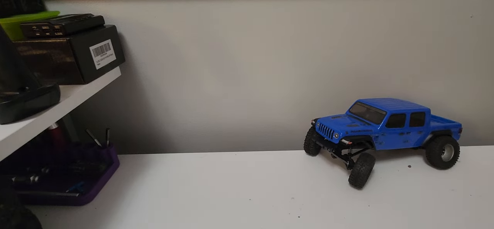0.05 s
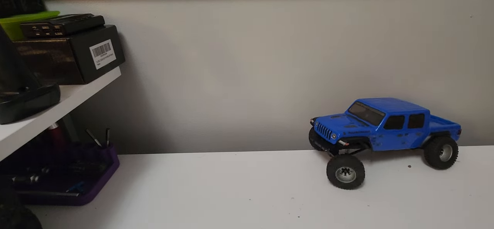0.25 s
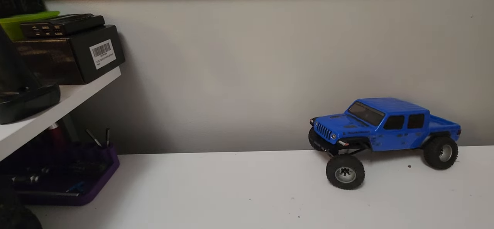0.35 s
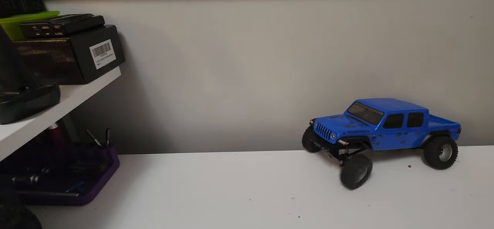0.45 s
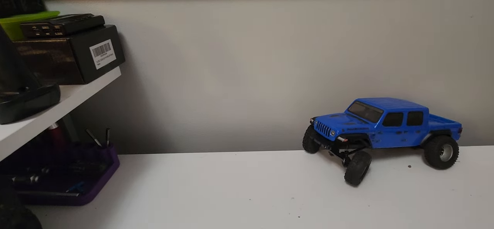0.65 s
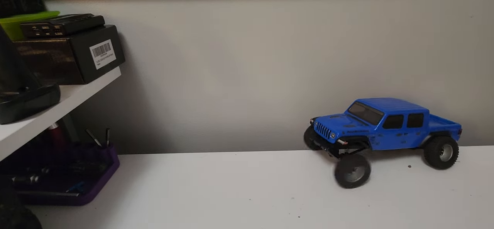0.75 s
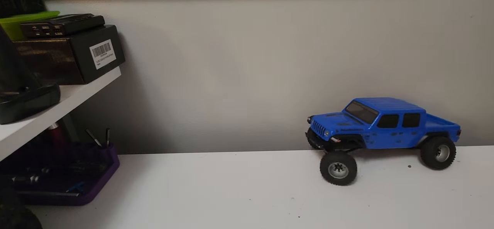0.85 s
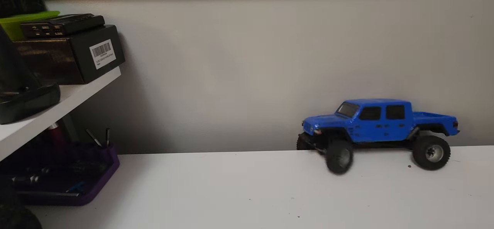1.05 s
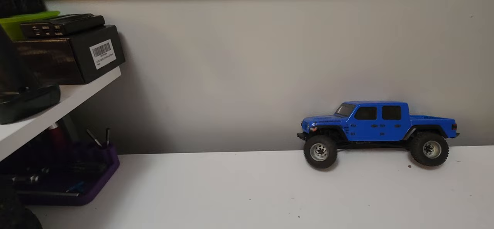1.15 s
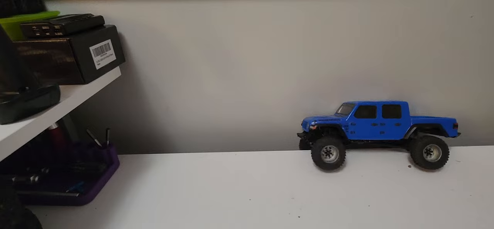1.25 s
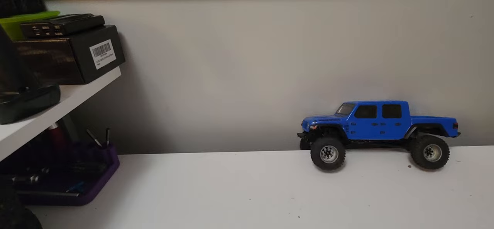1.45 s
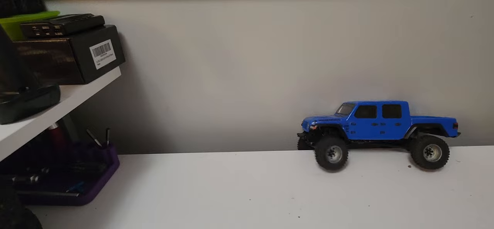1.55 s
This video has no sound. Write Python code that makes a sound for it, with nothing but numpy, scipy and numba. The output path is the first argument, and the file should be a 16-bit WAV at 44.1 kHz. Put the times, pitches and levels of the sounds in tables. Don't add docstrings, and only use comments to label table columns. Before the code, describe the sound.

A toy truck's small servo whirrs in short, bright, gritty bursts with plastic clicks and rod clacks, then its wheels knock and bounce on a hollow desk; small quiet room, close stereo microphone.

```python
import sys
import numpy as np
from scipy import signal
from scipy.io import wavfile
from scipy.ndimage import uniform_filter1d, map_coordinates
from numba import njit

SR = 44100
rng = np.random.default_rng(int(sys.argv[2]) if len(sys.argv) > 2 else 0)


def dump_mix(stems):
    frames = np.atleast_2d(stems).T
    limited = np.clip(frames, -1, 1)
    pcm = np.round(limited * 32767).astype(np.int16)
    wavfile.write(sys.argv[1], SR, pcm)


def invert_db(level):
    return 10 ** (np.asarray(level, dtype=float) / 20)


N = 70560
T = np.arange(N) / SR

# (frequency [Hz], level [dB])
AIR_COLOUR = [(15, -29), (25, -4.5), (206, -26), (591, -40), (3720, -48), (4140, -39), (9000, -53),
              (16000, -64)]
# (time [s], level [dB])
PUSH_CLICKS = [
    (0.206, -24),
    (0.82, -25),
    (1.591, -41.5),
]
# (frequency [Hz], level [dB], time to fade by 60 dB [s])
PUSH_RINGING = [(787, -19, 0.089), (1404, 0, 0.025), (2240, -17, 0.0065), (4100, -10, 0.0032),
                (6000, 3.5, .012), (7750, 1, 0.018)]
# (time [s], level [dB])
PULL_CLICKS = [
    (0.46, -21),
    (1.015, -20.5),
]
# (frequency [Hz], level [dB], time to fade by 60 dB [s])
PULL_RINGING = [(1523, -7, 0.03), (1502, -22, 0.19), (2006, -3, 0.0094), (3030, -9.5, 0.0083),
                (4440, -1, 0.01), (5700, 0.5, 0.016)]
# (time [s], level [dB], pitch [Hz], time to fade by 60 dB [s])
ROD_CLACKS = [(0.237, -23.5, 788, 0.046), (0.2423, -28.5, 448, 0.069), (.348, -31.5, 711, 0.077),
              (.378, -41, 425, 0.097), (.488, -22, 1264, 0.025), (.493, -27, 484, 0.033),
              (.533, -33, 884, 0.032), (.598, -36, 800, 0.065), (.864, -29.5, 438, 0.059),
              (.921, -35, 687, 0.091), (0.979, -34, 1190, 0.047), (1.043, -23.5, 465, 0.045),
              (1.258, -32.5, 962, 0.092), (1.338, -30, 891, 0.19), (1.39, -46.5, 554, 0.14),
              (1.415, -42.5, 377, 0.079), (1.453, -38, 553, 0.13), (1.48, -42.5, 387, .07)]
# (multiple of its pitch [ratio], level [dB], part of its fade time [ratio])
ROD_RINGING = [(1, 4.5, 0.95), (1.6, -4.5, 0.62), (2.5, -4, 0.27)]
# (time [s], level [dB])
SERVO_TICKS = [(.148, -73), (.167, -60), (.182, -49), (.231, -40), (.781, -41), (1.563, -48)]
# (time [s], level [dB], contact time [ms], desk tone favoured by the spot [Hz])
WHEEL_KNOCKS = [(0.002, -44.5, 3.7, 119), (0.267, -29, 12.4, 79.5), (.325, -28.5, 10, 54.6),
                (0.551, -37.5, 2.2, 204), (0.679, -35, 6.6, 64), (0.874, -42, 5, 140),
                (1.0954, -5.5, 0.52, 370), (1.0987, -9, 2.9, 80.4), (1.118, -20, 0.7, 995),
                (1.1723, -9.5, 0.55, 202), (1.1938, -10, 0.22, 195), (1.202, -10.5, 1.02, 270),
                (1.208, -9.5, 0.97, 206), (1.214, -14, 0.43, 770), (1.2236, -12, 0.85, 258),
                (1.2315, -24, 0.66, 460), (1.245, -26.5, 1.1, 258), (1.28, -25.5, 0.42, 258),
                (1.293, -23, 2.7, 146), (1.338, -24.5, 3.5, 146), (1.362, -28, 2.3, 121),
                (1.418, -36.5, 2.7, 190), (1.452, -38, 1.9, 146), (1.482, -35.5, 2.1, 188),
                (1.53, -41, 4.4, 146)]
# (frequency [Hz], level [dB], time to fade by 60 dB [s])
DESK_TONES = [(54, -7, 0.34), (79.1, 1.5, 0.24), (118.6, -4.5, 0.17), (146, -5.5, 0.11), (195, -7.5, 0.1),
              (256, -5, 0.14), (357, -4, 0.077), (459, -3, 0.04), (540, -5, 0.037), (652, -7.5, 0.051),
              (771, -4, 0.037), (920, -6.5, 0.053), (1026, 1, 0.039), (1176, -1, 0.031),
              (1364, -1.5, 0.024)]
# (start [s], length [s], rise time [s], rattle level [dB])
SERVO_RUNS = [(-.05, 0.049, 0.014, -52), (0.213, 0.02, 0.018, -37), (0.234, .12, 0.014, -33.5),
              (0.481, 0.15, 0.037, -35), (0.774, .17, 0.1, -34), (1.025, 0.12, 0.052, -32.5),
              (1.147, 0.14, 0.051, -38), (1.301, 0.057, 0.0078, -38), (1.383, 0.027, 0.013, -40),
              (1.439, 0.038, 0.012, -39.5), (1.569, 0.05, 0.0045, -48.5)]
# (frequency [Hz], width [Hz], level [dB], left over right [dB])
CASE_TONES = [(800, 228, -10.5, 0), (1310, 270, -21, 3), (2400, 1100, -22, 2.5), (4200, 2700, -39, -1),
              (5700, 790, -13, 4), (7300, 1170, -4.5, -4.5), (8000, 830, -8.5, -4.5), (10890, 1200, -6, 1),
              (11950, 1460, -5, -7), (13040, 2170, -9.5, 8.5), (15600, 1060, -7, 14.5),
              (15730, 110, -15, 0)]
# (time [s], teeth per second [Hz], whine level [dB])
EARLY_SWEEPS = [
    [(.243, 7650, -41.5), (.254, 7300, -32), (.266, 6420, -34), (.28, 6600, -43), (.287, 6950, -30),
     (.298, 6250, -27.5), (.306, 5800, -26), (.322, 6120, -35), (.336, 5900, -31.5), (.355, 5210, -32.5)],
    [(.505, 7200, -38), (.524, 7380, -21), (.534, 6874, -25), (.546, 6814, -24.5), (.56, 7120, -33.5),
     (.574, 6080, -28.5), (.601, 5970, -26), (.617, 5210, -30)],
    [(.838, 5500, -35), (.853, 6050, -33), (.866, 6700, -42), (.872, 6900, -36), (.881, 6300, -31),
     (.891, 6000, -40), (.904, 6320, -33), (.917, 5850, -31), (.932, 5150, -30)],
]
LATE_SWEEPS = [
    [(1.052, 6850, -52), (1.072, 7190, -27.5), (1.102, 7330, -25), (1.11, 7000, -55), (1.12, 6000, -27.5),
     (1.134, 4850, -25)],
    [(1.208, 7520, -35), (1.221, 6600, -25.5), (1.232, 6560, -32)],
    [(1.308, 6000, -63), (1.32, 6400, -33.5), (1.331, 7020, -33.5), (1.352, 7300, -39)],
]
# (time [s], length [s], start pitch [Hz], end pitch [Hz], level [dB])
GEAR_SQUEAKS = [(0, 0.041, 5490, 5300, -70), (0, 0.057, 10800, 10500, -72),
                (0.231, 0.0038, 11800, 11500, -29.5), (0.258, 0.011, 14800, 14950, -30),
                (.266, 0.0043, 14900, 14300, -36), (.274, 0.011, 14700, 14900, -41),
                (0.302, 0.018, 15000, 15700, -36), (0.316, .012, 15300, 15100, -43),
                (0.54, 0.0088, 14900, 14400, -50), (.544, 0.012, 15500, 15500, -42),
                (.585, 0.023, 12100, 13000, -29), (0.801, 0.022, 11600, 11950, -48),
                (.85, .008, 14700, 14600, -37), (0.86, 0.014, 11940, 12100, -48),
                (.92, 0.013, 8500, 7950, -52), (1.146, .016, 14400, 14100, -41),
                (1.244, .04, 8130, 7800, -53), (1.383, 0.016, 8120, 7750, -43),
                (1.451, 0.026, 13100, 12950, -40.5), (1.34, 0.021, 11300, 10760, -41.5),
                (0.55, 0.026, 11300, 11400, -36.5), (0.827, 0.018, 14300, 15150, -46),
                (.874, 0.033, 15200, 15300, -39), (1.216, 0.015, 15160, 15600, -38),
                (1.262, 0.022, 14700, 14600, -37.5), (1.342, 0.021, 14800, 14700, -38)]


@njit
def band_pass(x, hz, width):
    y, band, low = np.empty(len(x)), 0., 0.
    g, k = np.tan(np.pi * hz / SR), width / hz
    for i in range(len(x)):
        v = (band + g * (x[i] - low)) / (1 + g * (g + k))
        band, low = 2 * v - band, low + 2 * g * v
        y[i] = k * v
    return y


def wander(rate):
    hold = int(SR / rate)
    steps = np.repeat(rng.standard_normal(N // hold + 1), hold)
    return 1.98 * uniform_filter1d(uniform_filter1d(steps, hold), hold)[:N]


def add(out, at, sound):
    i = int(at * SR)
    out[..., i:i + sound.shape[-1]] += sound[..., :N - i]


def ring(modes, scale=1, spread_db=2.5, detune=0.025):
    hz, db, t60 = np.array(modes).T[:, :, None]
    t = T[:int(t60.max() * SR)]
    chance = rng.standard_normal((3,) + db.shape)
    sign = np.where(hz < 100, 1, np.sign(chance[1]))
    strength = invert_db(db + spread_db * chance[0]) * sign
    tone = np.sin(2 * np.pi * hz * scale * (1 + detune * chance[2]) * t)
    fade = np.exp(-np.log(1000) * t / t60)
    y = (strength * tone * fade).sum(axis=0)
    return y / np.abs(y).max()


def crack(decay_s, hz, width):
    y = rng.standard_normal(SR // 8)
    for _ in range(2):
        y = band_pass(y, float(hz), 1.48 * width)
    y = y * np.exp(-T[:SR // 8] / decay_s)
    return y / np.abs(y).max()


def two_port_crack(decay_s, hz, width):
    shared = crack(decay_s, hz, width)
    own = np.array([crack(decay_s, hz, width) for _ in range(2)])
    return 0.57 * shared + 0.83 * own


def air():
    out = 0
    f, level_db = np.array(AIR_COLOUR).T
    for hz in 30 * 2 ** np.arange(0, 9.1, .5):
        mid, side = (band_pass(rng.standard_normal(N), hz, hz / 3) for _ in range(2))
        db = np.interp(np.log(hz), np.log(f), level_db) + 1.5 * wander(3.2)
        apart = min(hz / 430, 1) * side * np.array([[1], [-1]])
        out = out + invert_db(db) * (mid + apart)
    supply = invert_db(-75 + 1.6 * wander(60)) * np.sin(2 * np.pi * 15900 * T)
    return out * invert_db(-62.5) / out.std() + supply


def room_tail(near):
    t60_s, first_echo_s = 0.24, .0015
    t = T[:SR // 3]
    tail = rng.standard_normal((2, len(t))) * np.exp(-np.log(1000) * t / t60_s) * (t > first_echo_s)
    tail = np.array([band_pass(side, 1285.0, 2520.0) for side in tail])
    tail = tail / np.sqrt((tail ** 2).sum(axis=1, keepdims=True))
    return invert_db(-8.5) * signal.fftconvolve(near, tail, axes=1)[:, :N]


def remote_clicks():
    out = np.zeros((2, N))
    for events, modes in ((PUSH_CLICKS, PUSH_RINGING), (PULL_CLICKS, PULL_RINGING)):
        for at, db in events:
            add(out, at, invert_db(db) * ring(modes))
            add(out, at + .0025, invert_db(db + 4) * ring(modes))
            add(out, at, invert_db(db + 2) * crack(0.0031, 6930, 5500))
    return out


def rod_clacks():
    out = np.zeros((2, N))
    for at, db, hz, t60 in ROD_CLACKS:
        modes = np.array(ROD_RINGING) * [1, 1, t60]
        add(out, at, invert_db(db - 4.5) * ring(modes, hz, spread_db=3, detune=0.0062))
        add(out, at, invert_db(db + 0.5) * two_port_crack(0.0072, 2560, 7900))
    for at, db in SERVO_TICKS:
        add(out, at, invert_db(db) * crack(.002, 12300, 6000))
    return out


def desk(load):
    spot_db, spot_octaves = 8, 0.083
    out = np.zeros((2, N))
    for at, db, ms, spot_hz in WHEEL_KNOCKS:
        struck = []
        for hz, level_db, t60 in DESK_TONES:
            distance = np.log2(hz / spot_hz) / spot_octaves
            struck.append((hz, level_db + spot_db / (1 + distance ** 2), t60))
        push = np.hanning(int(ms * SR / 1000) + 3)
        boom = np.convolve(ring(struck, spread_db=0.87, detune=0.0071), push / push.sum())
        add(out, at, -invert_db(db) * boom)
        hardness = 1 / (1 + ms ** 3)
        add(out, at, invert_db(db - 3.5) * hardness * crack(0.004, 2170, 4100))
        add(out, at, invert_db(db - 17.5) * hardness * two_port_crack(0.027, 1470, 4600))
    scrub = signal.fftconvolve(load * rng.standard_normal(N), ring(DESK_TONES[:4]))[:N]
    return out + invert_db(-43) * scrub


def effort():
    stop_db, stop_s, coast_db_per_s = -13.5, 0.025, 158
    out = 0
    for at, length, rise, db in SERVO_RUNS:
        after = np.maximum(T - at - length, 0)
        fall_db = stop_db * np.minimum(after / stop_s, 1) - coast_db_per_s * after
        out = out + np.clip((T - at) / rise, 0, 1) ** 0.99 * invert_db(db + fall_db)
    return out * invert_db(2.27 * wander(39.94))


def radiated(hz):
    f, width, db, pan_db = np.array(CASE_TONES).T[:, :, None]
    power = invert_db(2 * db) / (1 + (2 * (hz - f) / width) ** 2) ** 1.98
    return np.sqrt([(power * invert_db(side * pan_db)).sum(axis=0) for side in (1, -1)])


def whine():
    octave_db, left_lead_rad, edge_s = -2, .7, 0.0017
    out = np.zeros((2, N))
    jitter = 1 + .003 * wander(700)
    flutter = [invert_db(2.5 * wander(420)) for _ in range(2)]
    for sweep in EARLY_SWEEPS + LATE_SWEEPS:
        t, hz, db = np.array(sweep).T
        on = (T > t[0]) & (T < t[-1])
        now = T[on]
        hz = np.interp(now, t, hz)
        phase = 2 * np.pi * np.cumsum(hz * jitter[on]) / SR
        edge = np.clip(np.minimum(now - t[0], t[-1] - now) / edge_s, 0, 1)
        tone = 0
        for k in range(2):
            lead = (1 - k) * np.array([[left_lead_rad], [0]])
            level = invert_db(k * octave_db) * radiated((k + 1) * hz) * (6000 / hz) ** (3 * k)
            tone = tone + level * flutter[k][on] * np.sin((k + 1) * phase + lead)
        out[:, on] += edge * invert_db(np.interp(now, t, db)) * tone
    for at, length, hz0, hz1, db in GEAR_SQUEAKS:
        on = (T > at) & (T < at + length)
        hz = np.linspace(hz0, hz1, on.sum()) * jitter[on]
        swell = np.hanning(on.sum()) ** .5 * flutter[1][on]
        out[:, on] += invert_db(db - 0.5) * swell * np.sin(2 * np.pi * np.cumsum(hz) / SR)
    return out * invert_db(8)


def servo(load):
    hits_per_s, scatter_db = 18000, 3
    out = whine()
    hit = rng.random(N) < hits_per_s / SR
    teeth = hit * rng.choice([-1., 1.], N) * invert_db(scatter_db * rng.exponential(size=N))
    teeth = load * teeth / teeth.std()
    for hz, width, db, pan_db in CASE_TONES:
        own = load * rng.standard_normal((2, N)) * 1.244
        flicker = invert_db(1.59 * wander(140))
        body = []
        for noise in own:
            shaken = band_pass(flicker * (teeth + noise) * 3, float(hz), 1.35 * width)
            body.append(band_pass(shaken, float(hz), 2.0 * width))
        out = out + invert_db(db) * np.array(body) * invert_db(np.array([[pan_db], [-pan_db]]) / 2)
    return out


def scene():
    left_lag_s = 5.8e-5
    load = effort()
    near = servo(load) + remote_clicks() + rod_clacks() + desk(load)
    left = map_coordinates(near[0], [(T - left_lag_s) * SR], mode="nearest")
    return np.array([left, near[1]]) + room_tail(near) + air()


def band_limit(x):
    return signal.sosfilt(signal.butter(12, 17020, fs=SR, output="sos"), x)


def record(dry):
    top_cut = signal.ellip(8, .3, 35, 15870, fs=SR, output="sos")
    bass_cut = signal.butter(3, 44, "high", fs=SR, output="sos")
    mix = signal.sosfilt(bass_cut, signal.sosfilt(top_cut, dry))
    return band_limit(mix)


dry = scene()
out = record(dry)
dump_mix(out)
```